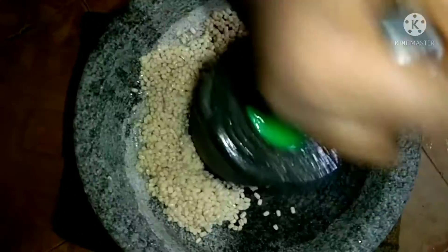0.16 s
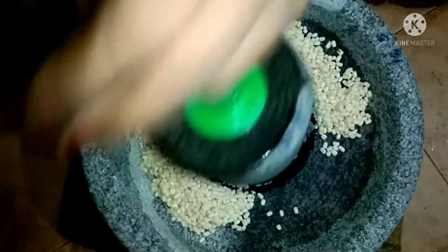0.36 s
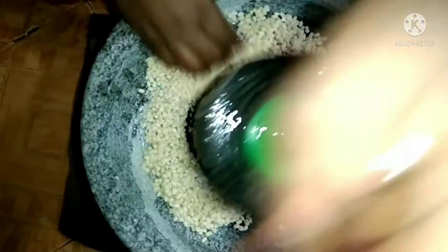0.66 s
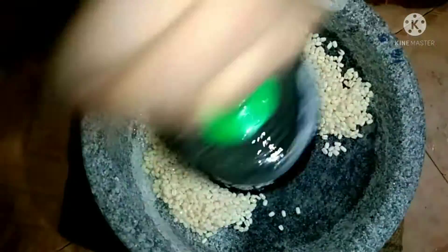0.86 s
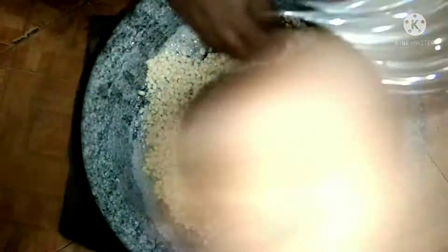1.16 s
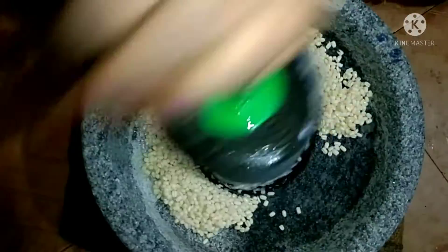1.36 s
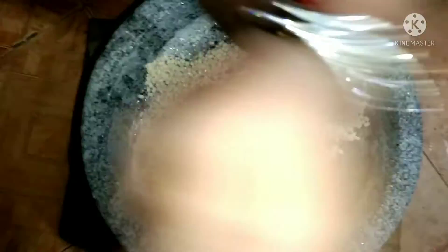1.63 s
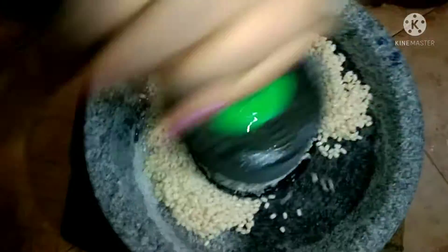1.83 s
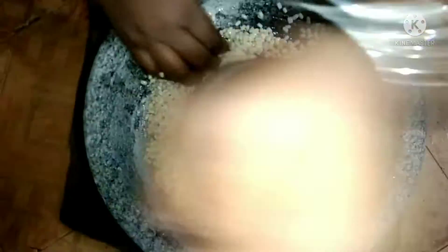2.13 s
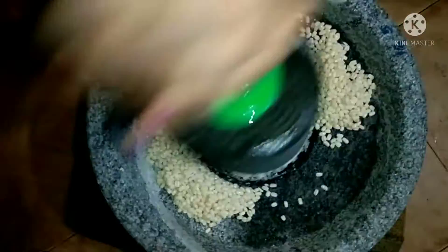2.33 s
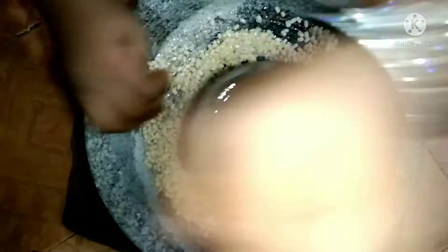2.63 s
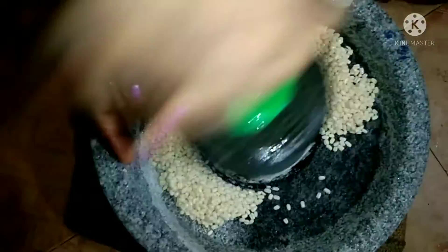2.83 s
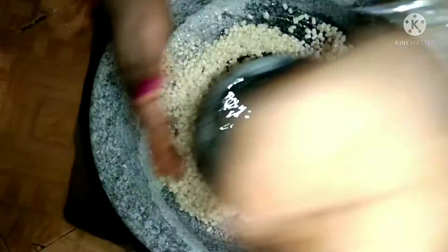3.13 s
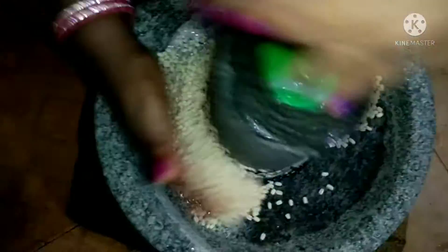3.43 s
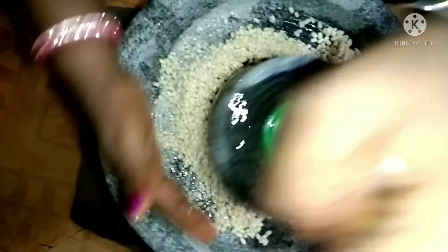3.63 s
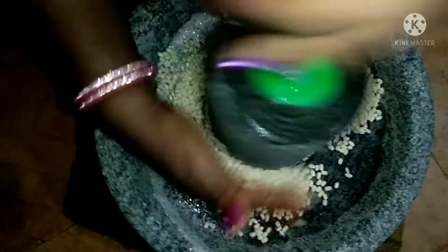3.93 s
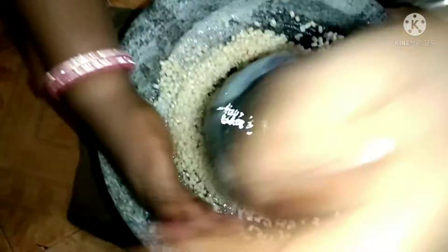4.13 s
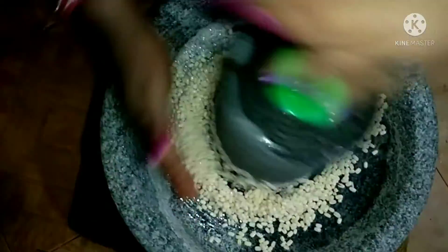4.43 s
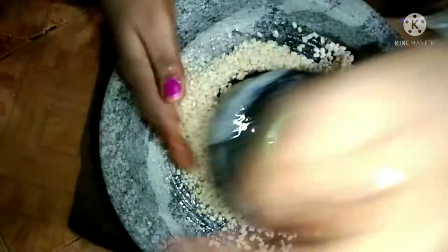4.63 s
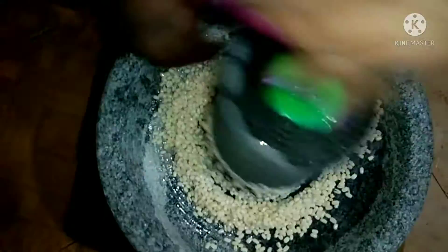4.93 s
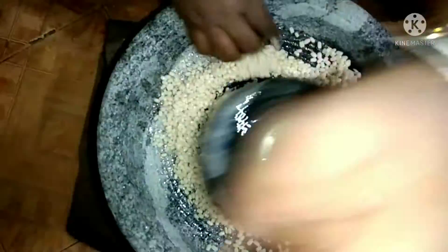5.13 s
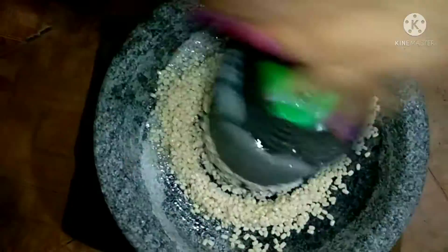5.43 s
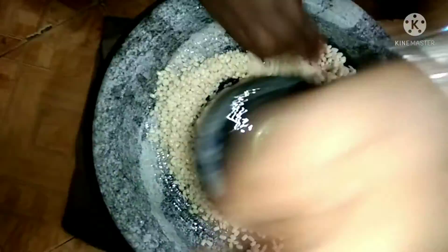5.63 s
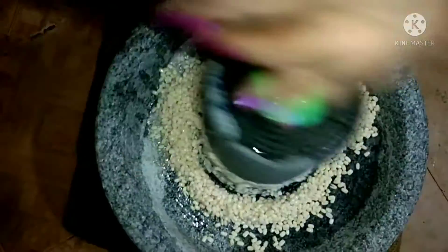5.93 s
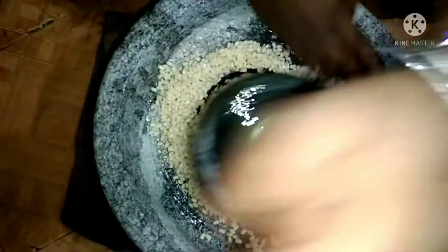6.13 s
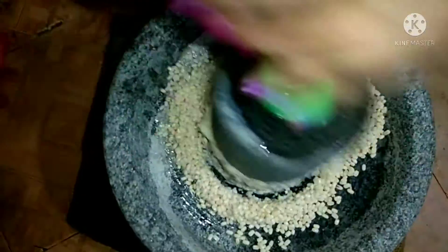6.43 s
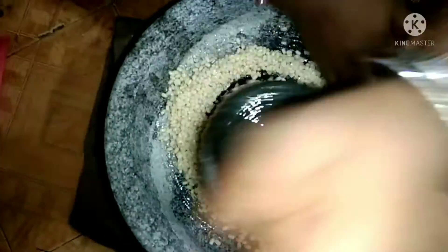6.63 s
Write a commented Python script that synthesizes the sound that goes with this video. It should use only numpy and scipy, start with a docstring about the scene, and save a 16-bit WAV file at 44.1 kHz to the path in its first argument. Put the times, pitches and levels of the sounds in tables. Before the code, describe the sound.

A stone pestle grinds soaked lentils in a heavy mortar, crisp and gritty, with hollow knocks fading midway and a few faint hoarse crow-like rasps.

```python
"""Soaked lentils are crushed in a stone mortar by a pestle rolled by hand, about two turns a second.
Crunching is shaped noise and short resonances swelling at each push; cracks are brief noise bursts.
Knocks on the bowl are sums of decaying modes; rolling stone is grit noise with the bowl resonating.
Behind them the stone hums low through the floor (resonated noise),
and now and then a hoarse rasp like a crow's sounds (a pulse train in a narrow band)."""
import sys
import numpy as np
from scipy import signal
from scipy.fft import rfft, irfft
from scipy.io import wavfile
from scipy.ndimage import uniform_filter1d

SR = 44100
rng = np.random.default_rng(int(sys.argv[2]) if len(sys.argv) > 2 else 0)


def digitize_waveform(pressure):
    """Quantize a signal to 16-bit integers and store it at the path in sys.argv[1].

    Rows of a 2-D input are taken as channels; values are limited to [-1, 1].
    """
    field = np.atleast_2d(pressure).T
    bounded = np.clip(field, -1, 1)
    quanta = np.round(bounded * 32767).astype(np.int16)
    wavfile.write(sys.argv[1], SR, quanta)


N = 298998

# Steady crunch, pushes aside: [t/s, level/dB]
STEADY_CRUNCH = [(0, -43.5), (.5, -45.5), (.8, -41.5), (3.4, -41.5), (6.78, -40.5)]
# Pushes of the pestle, two a turn: [crest t/s, swell level/dB, level/dB of the lull behind it],
# both levels relative to the steady crunch
PUSHES = [(.05, -2.5, -5), (.24, 1, -1), (.39, 5.5, -6), (.68, 5, 0.5), (0.931, 4, -3), (1.1, 0, -5.5),
          (1.27, 8, 0), (1.55, 3, -1), (1.75, -1.5, -1), (2.01, 2, -3), (2.26, 1.5, -1), (2.5, 2.5, 2),
          (2.761, -1.5, -0.5), (3.04, 6, 0), (3.2, 2.5, -1.5), (3.559, 8.5, -7.5), (3.78, -3, 1),
          (4.08, 7.5, -5.5), (4.328, 4, -3), (4.574, 12, -2.5), (4.82, -1.5, -2.5), (5.042, 7.5, -3),
          (5.34, 5, -3), (5.546, 6.5, -6), (5.72, 5, 3), (6.003, 3, -3), (6.276, 4.5, -6), (6.53, 3, -5.5),
          (6.751, 2, 11)]
# Spectrum of crushed grain: [f/Hz, relative level/dB per Hz]
CRUNCH_SPECTRUM = [(1470, -35), (2500, -9.5), (4080, -2.5), (5150, 0), (5690, -3.5), (8020, 3),
                   (14700, -23), (16000, 1)]
# Single lentils cracking: [t/s, relative peak level/dB, f/Hz]
CRACKS = [(0.1532, -22, 6470), (0.337, -15.5, 3700), (0.38, -12.5, 2190), (0.583, -15, 8300),
          (0.653, -11, 8100), (0.6849, -6.5, 9000), (1.098, -12.5, 6160), (1.251, -20, 8450),
          (1.2726, -14, 7950), (1.3068, -14, 7760), (1.374, -24, 7850), (1.5447, -13.5, 8600),
          (1.742, -16.5, 7600), (1.8995, -19, 5600), (1.999, -16, 7900), (2.06, -18.5, 7840),
          (2.1637, -16.5, 8150), (2.496, -10.5, 7300), (2.6903, -16, 8500), (2.982, -14.5, 7840),
          (3.037, -14.5, 9100), (3.064, -14.5, 8160), (3.414, -22.5, 4000), (3.4825, -11, 7600),
          (3.7318, -16, 7340), (3.7773, -12, 8400), (3.864, -21, 4270), (4.0756, -14.5, 6400),
          (4.338, -13, 4700), (4.436, -9.5, 8500), (4.515, -13.5, 7700), (5.024, -16.5, 7840),
          (5.062, -15, 7200), (5.1468, -15.5, 7800), (5.212, -16.5, 6600), (5.346, -16.5, 7800),
          (5.427, -19.5, 7700), (5.502, -16, 4030), (5.506, -9.5, 6300), (5.5119, -8.5, 5300),
          (5.52, -26, 6750), (5.543, -16, 5500), (5.716, -12, 8600), (5.7598, -15.5, 7300),
          (5.987, -16, 7850), (6.043, -15, 5600), (6.2003, -16.5, 7160), (6.434, -18.5, 7200),
          (6.65, -18.5, 8900)]
# Pestle on bowl: [t/s, relative strength level/dB, lowest modes level/dB, low modes level/dB,
# upper modes level/dB, favoured f/Hz, share of the free ring time]
KNOCKS = [(0.022, -25.5, -4, -14, -44, 514, 0.86), (0.224, -7.5, -47, -24, -8.5, 525, 0.55),
          (0.238, -18, -22, -12.5, -12, 730, 0.98), (0.323, -16.5, -17, -27.5, -8.5, 746, 0.54),
          (0.337, -22.5, 0, -20, 3, 1160, 0.24), (0.378, -10.5, -10, -21, -8, 784, 0.48),
          (0.427, -6.5, -43, -44, -13.5, 820, 0.21), (0.689, -27, -13, -13.5, -14, 463, 0.84),
          (0.91, -5, -23.5, -23.5, -17, 504, 0.82), (0.932, -16, -40, -40, -1, 503, 0.29),
          (1.114, -34.5, -7, -3.5, -7, 900, 0.81), (1.396, -4.5, -15.5, -23, -24, 477, 0.27),
          (1.411, -2, -45, -42, -9.5, 780, 0.45), (1.645, -9, -12.5, -19, -14.5, 513, 0.36),
          (1.797, -30, 1, -5, -13.5, 418, 0.67), (1.89, -8.5, -31, -23, -13.5, 780, 0.35),
          (2.166, -14.5, -9.5, -13.5, -19.5, 710, 0.76), (2.304, -22, -7, -9.5, -16.5, 960, 0.32),
          (2.408, -7, -33, -34, -16.5, 896, 0.24), (2.676, -15, -11, -18, -20, 694, 0.93),
          (3.173, -12.5, -7.5, -17, -19.5, 734, 0.5), (3.418, -14.5, -20.5, -22.5, -9.5, 700, 0.4),
          (3.711, -11.5, -17, -14.5, -13, 886, 0.23), (3.919, -37, -15, -13, -20, 460, 0.5),
          (4.208, -17, -10, -19, -19.5, 684, 0.66), (5.318, -55, -43, -51, 7.5, 1135, 0.72),
          (5.587, -42, -9, -42, 3, 650, 0.4), (5.858, -42.5, -3, -15.5, -25, 640, 0.5),
          (6.177, -10, -13.5, -30, -18.5, 676, 0.44), (6.324, -38, -5.5, -36, -4, 640, 0.44),
          (6.705, -40.5, 5, -15.5, -9, 610, 0.63)]
# Modes of mortar and floor: [f/Hz, relative level/dB, free t60/s]
BOWL_MODES = [(225.5, 7.5, 0.17), (335, 2, 0.29), (359.8, 12.5, 0.14), (454.4, -3.5, 0.12),
              (504.3, -2, 0.1), (605, -7, 0.18), (654, 0, 0.075), (719, -6.5, 0.13), (823, 2.5, 0.071),
              (922, 0, 0.13), (1129, 13, 0.035), (1233, -17, 0.36), (1477, -2, 0.038)]
# Stone rolling on stone, lifts aside: [t/s, rumble level/dB, rub level/dB]
ROLLING = [(0, -35, -43.5), (.15, -48, -49.5), (.55, -53.5, -55), (.8, -53.5, -58.5), (1.15, -46.5, -54),
           (1.5, -52, -55.5), (2.0, -50.5, -58), (2.55, -64, -60), (3.3, -62.5, -55.5), (4.4, -71, -58),
           (5.13, -75.5, -59.5), (5.22, -77, -79), (5.485, -74, -83), (5.505, -78, -61), (5.83, -74, -58),
           (5.9, -61.5, -58.5), (6.3, -69, -57.5), (6.68, -77, -76), (6.72, -48.5, -55.5)]
# Spectra of rumble, rub and scrape: [f/Hz, relative level/dB per Hz]
RUMBLE_SPECTRUM = [(170, 2), (230, 2.5), (330, -5), (450, -4), (560, -5.5)]
RUB_SPECTRUM = [(560, -11.5), (640, 3), (800, 3.5), (1000, 5.5)]
SCRAPE_SPECTRUM = [(1060, -13.5), (1170, 1), (1400, 2.5), (2000, 7), (2800, -3), (3600, -62)]
# Hum of the stone: [t/s, level/dB before its swell is evened]
HUM_LEVEL = [(0.0, -48), (1.6, -49.5), (1.66, -39.5), (1.81, -48.5), (2.32, -46), (2.53, -54),
             (2.74, -39.5), (3.0, -48.5), (4.79, -46.5), (5.36, -68), (5.91, -45), (6.7, -51)]
# Spectrum of the noise beneath the hum: [f/Hz, relative level/dB per Hz]
SUBSOIL_SPECTRUM = [(35, -42), (75, 23.5), (135, 9), (170, 2.5)]
# Hoarse rasps: [start t/s, end t/s, start level/dB, end level/dB, nominal start pulses/s, end pulses/s]
RASPS = [(-.05, 0.256, -49, -43.5, 98, 99), (2.886, 3.298, -59, -56.5, 110, 130),
         (4.528, 5.047, -43.5, -53.5, 97, 89)]
# Band of the rasp before it sinks: [f/Hz, relative level/dB per Hz]
RASP_SPECTRUM = [(1580, -7), (1720, 16), (1830, -5), (1960, 15), (2100, -0.5)]

BUILD_S, BREAK_S = 0.04, 0.029   # the crunch builds more slowly than it breaks off
LULL_LAG_S, LULL_S = 0.095, 0.042   # delay of the lull after the crest, and its half-width
HARD_DB, SWING_S = -21, .21   # a hard knock exceeds this strength after at least this free swing
LIFT_S, LIFT_DB = 0.096, -15.5   # before it the pestle leaves the bowl
STOPPED_S = .255   # the knocks before this time stop ringing here
SUBSOIL_DB = -54.5
RASP_FADE_S, RASP_SINK = 0.025, .93   # the band sinks to this share of its pitch
STOP_BAND_HZ = 15700 * 1.03


def pushing():
    """Amplitude modulation by the hand: crunch level in dB, swelling at each push, with a lull after."""
    level_db, = in_time(STEADY_CRUNCH)
    for s, swell_db, lull_db in PUSHES:
        level_db = level_db + swell_db * bump(s, BUILD_S, BREAK_S)
        level_db = level_db + lull_db * bump(s + LULL_LAG_S, LULL_S, LULL_S)
    return level_db


def crunch(level_db):
    """Random fracture: clumped splinter bursts of a millisecond or two and ringing snaps over wet hiss."""
    sizes = amp(4.5 * np.minimum(rng.exponential(1, N), 3.0))
    born = rng.random(N) < 380 * amp(3 * drift(30)) / SR   # breaks per s, clumped
    fade = np.exp(-1 / (.0007 * SR))
    splinters = signal.lfilter([1], [1, -fade], sizes * born) * rng.standard_normal(N)
    snap_rate = 1500 * amp(5.0 * drift(36))
    snaps = grains(snap_rate, 1.7, low_hz=2494, high_hz=16380, cycles=77, count=18)
    hiss = rng.standard_normal(N) * amp(1.94 * drift(130))
    mix = 0.57 * coloured(splinters, CRUNCH_SPECTRUM)
    mix = mix + 0.35 * coloured(snaps, CRUNCH_SPECTRUM)
    mix = mix + 0.68 * coloured(hiss, CRUNCH_SPECTRUM)
    return amp(level_db) * patchy(mix, 2040, 20300, patchy_db=3.0, count=7)


def cracks():
    """Brittle failure: runs of splinters, milliseconds long, mostly near one pitch; deep ones trail longer."""
    out, ms = np.zeros(N + 2000), np.arange(2000) / SR * 1000
    draws = rng.standard_normal((len(CRACKS), 2, 2000))
    for (s, peak_db, hz), (noise, lumps) in zip(CRACKS, draws):
        hold_ms = 1.2 + 3 * lumps[0] ** 2 / (1 + lumps[0] ** 2)
        decay = np.exp(-np.maximum(ms - hold_ms, 0) / .8)
        trail = .25 * np.exp(-ms * hz / 45000)
        shape = (1 - np.exp(-ms / .3)) * (decay + trail)
        drive = noise * shape * amp(18 * uniform_filter1d(lumps, size=30))
        burst = 0
        for share, wide in [(0.83, 1.215), (.22, 1.64)]:   # a narrow and a wide band
            band = signal.butter(2, [hz / wide, hz * wide], "band", fs=SR, output="sos")
            burst = burst + share * signal.sosfilt(band, drive)
        out[round(s * SR):][:2000] += amp(peak_db - 5.0) * burst / np.abs(burst).max()
    return out[:N]


def knocks(rows):
    """Modal excitation: a blow rings every mode by the spot struck; two rebounds and a noisy tail follow."""
    hz, level_db, t60 = np.transpose(BOWL_MODES)[:, :, None]
    out, t = np.zeros(N + SR), np.arange(SR // 3) / SR
    chance = rng.standard_normal((len(rows), 5, len(BOWL_MODES), 1))
    rebounds = rng.random((len(rows), 2))
    for row, draws, late in zip(rows, chance, rebounds):
        s, strength_db, lowest_db, low_db, upper_db, favoured_hz, share = row
        scatter, detune, slip, *rattle = draws
        spot_db = np.select([hz < 280, hz < 420, hz > 750], [lowest_db, low_db, upper_db], -9)
        spot_db = spot_db + 8 * np.exp(-(np.log(hz / favoured_hz) / 0.13) ** 2)
        spot_db = spot_db + 1.5 * scatter
        # the modes meet in a loose crest just after the touch
        phase = 2 * np.pi * hz * (1 + 0.012 * detune) * (t - .0015) + 1.3 * slip
        rings = amp(spot_db + level_db) * np.cos(phase) * 1000 ** (-t / (t60 * share))
        # deep modes and gentle blows swell slowly
        rise_s = 0.002 + 1.22 / hz - min(strength_db + 39.5, 0) * 0.00026
        cushion = np.sin(np.pi / 2 * np.clip(t / rise_s, 0, 1)) ** 2
        blow = amp(strength_db - 4.0) * cushion * rings
        # first touch, then two rebounds whose modes are reweighted by chance
        touches = [(.0008, 0),
                   (0.012 + 0.01185 * late[0], -13 + 5 * rattle[0]),
                   (0.04 + 0.033 * late[1], -19 + 5 * rattle[1])]
        for lag, gain_db in touches:
            out[round((s + lag) * SR):][:len(t)] += (amp(gain_db) * blow).sum(axis=0)
    out = signal.sosfilt(signal.butter(4, 160, "high", fs=SR, output="sos"), out[:N])
    # the kitchen answers with a short wash that soon turns dull
    air = rng.standard_normal(len(t)) * (1 - np.exp(-t / 0.00096))
    dull = signal.sosfilt(signal.butter(2, 600, fs=SR, output="sos"), air)
    wash = air * 1000 ** (-t / 0.15) + 0.41 * dull * 1000 ** (-t / 0.61)
    return out + amp(-39.0) * signal.fftconvolve(out, wash)[:N]


def lifting():
    """Loss of contact: dB taken off the rolling while the pestle is in the air before a hard knock."""
    s, strength_db = np.transpose(KNOCKS)[:2]
    landings = s[(strength_db > HARD_DB) & (np.diff(s, prepend=0) > SWING_S)]
    return LIFT_DB * sum(bump(landing - .015, LIFT_S, 0.0035) for landing in landings)


def rolling(rumble_db, rub_db, scrape_db):
    """Frictional excitation: grit under the stone gives a deep rumble, a hollow rub and a lighter scrape."""
    grit = grains(4000, 0.91, low_hz=165.7, high_hz=3370, cycles=11.9, count=18)
    grit = patchy(grit, 126.5, 4120, patchy_db=3.5, count=8)
    # the bowl rings along, each mode in its own time
    bowl = sum(amp(6.4 * drift(2.5)) * rms_one(ring(grit, hz, t60 / 2)) for hz, _, t60 in BOWL_MODES)
    grit = grit + 0.45 * rms_one(bowl)
    rumble = amp(rumble_db) * coloured(grit, RUMBLE_SPECTRUM)
    rub = amp(rub_db) * coloured(grit, RUB_SPECTRUM)
    scrape = amp(scrape_db) * coloured(grit, SCRAPE_SPECTRUM)
    return rumble + rub + scrape


def hum(level_db):
    """Resonance driven by noise: heavy stone hums near 100 Hz through the floor, over a deep noise."""
    tone = rms_one(ring(ring(rng.standard_normal(N), 97.9, 0.28), 134.4, 0.045))
    # a steady push evens the swell
    tone = tone / np.sqrt(uniform_filter1d(tone ** 2, size=6000) + 0.17)
    subsoil = coloured(rng.standard_normal(N), SUBSOIL_SPECTRUM)
    return amp(level_db) * tone + amp(SUBSOIL_DB) * subsoil


def rasp():
    """Pulse excitation of a formant: nearly even pulses and noise pass through a narrow, sinking band."""
    t, gain, per_s, sunk = np.arange(N) / SR, np.zeros(N), np.full(N, 95.0), np.zeros(N)
    for start, end, start_db, end_db, first, last in RASPS:
        along = np.clip((t - start) / (end - start), 0, 1)
        edge = np.clip(np.minimum(t - start, end - t) / RASP_FADE_S, 0, 1)
        gain += amp(start_db + (end_db - start_db) * along) * edge
        per_s[edge > 0] = (first + (last - first) * along ** 2)[edge > 0]
        sunk[edge > 0] = along[edge > 0]
    cycles = np.cumsum(per_s * amp(0.11 * drift(9))) / SR
    pulses = np.diff(np.floor(cycles), prepend=0)
    drive = rms_one(pulses) + .45 * rng.standard_normal(N)
    high = coloured(drive, RASP_SPECTRUM)
    low = coloured(drive, np.multiply(RASP_SPECTRUM, [RASP_SINK, 1]))
    tone = (1 - sunk) * high + sunk * low
    return gain * patchy(tone, 1450, 2150, patchy_db=2.0, count=6)   # it catches unevenly


def amp(db):
    """Level definition: decibels to amplitude gain."""
    return 10 ** (np.asarray(db) / 20)


def rms_one(x):
    """Normalisation of power: scale to rms 1."""
    return x / np.sqrt(np.mean(x ** 2) + 1e-20)


def in_time(rows):
    """Linear interpolation: the columns of a curve table at every sample."""
    s, *columns = np.transpose(rows)
    return [np.interp(np.arange(N) / SR, s, c) for c in columns]


def bump(s, before_s, after_s):
    """Two-sided Gaussian: a smooth hill of height 1 at time s."""
    t = np.arange(N) / SR - s
    return np.exp(-(t / np.where(t < 0, before_s, after_s)) ** 2)


def drift(rate):
    """Low-passed noise: slow chance at about rate per second, drawn coarsely and joined up; rms 1."""
    step = 16
    r = np.exp(-2 * np.pi * rate * step / SR)
    noise = rng.standard_normal((N + SR) // step + 2)
    slow = signal.lfilter([1], [1, -2 * r, r * r], noise)[SR // step:]   # settled after a second
    return rms_one(np.interp(np.arange(N) / step, np.arange(len(slow)), slow))


def coloured(x, spectrum):
    """Spectral filtering: shape by a [f/Hz, level/dB] table, closed steeply outside; rms 1."""
    hz, level_db = np.transpose(spectrum)
    grid = np.log(np.arange(1, N // 2 + 2) * SR / N)
    outside = np.maximum(np.log(hz[0]) - grid, 0) + np.maximum(grid - np.log(hz[-1]), 0)
    gain_db = np.interp(grid, np.log(hz), level_db) - 80 * outside
    return rms_one(irfft(rfft(x) * amp(gain_db), N))


def patchy(x, low_hz, high_hz, patchy_db, count):
    """Independent band modulation: every band swells and fades in its own time; rms 1."""
    edges = np.geomspace(low_hz, high_hz, count + 1)
    out = 0
    for k, pair in enumerate(zip(edges, edges[1:])):
        band = signal.sosfilt(signal.butter(2, pair, "band", fs=SR, output="sos"), x)
        out = out + band * amp(patchy_db * drift(9.7)) * (-1) ** k
    return rms_one(out)


def ring(clicks, hz, t60):
    """Damped resonator: a unit click starts a decaying sine of initial height 1."""
    r, w = 1000 ** (-1 / (t60 * SR)), 2 * np.pi * hz / SR
    return signal.lfilter([0, np.sin(w)], [1, -2 * r * np.cos(w), r * r], clicks + 1e-18)


def grains(per_s, spread_db, low_hz, high_hz, cycles, count):
    """Random impulses on resonators: uneven snaps dealt among pitches, each falling 60 dB in given cycles."""
    sizes = amp(spread_db * np.minimum(rng.exponential(1, N), 5)) * rng.choice([-1, 1], N)
    born, dealt = rng.random(N) < per_s / SR, rng.integers(0, count, N)
    out = 0
    for k, hz in enumerate(np.geomspace(low_hz, high_hz, count)):
        t60 = cycles / hz
        out = out + ring(sizes * born * (dealt == k), hz, t60) / np.sqrt(t60)
    return out


def scene():
    """Superposition: all sources sum at one microphone."""
    stop = np.clip((STOPPED_S - np.arange(N) / SR) / .003, 0, 1)
    early_blows = stop * knocks([k for k in KNOCKS if k[0] < STOPPED_S])
    blows = early_blows + knocks([k for k in KNOCKS if k[0] >= STOPPED_S])
    crunch_db, lift_db = pushing(), lifting()
    rumble_db, rub_db = in_time(ROLLING)
    # the scrape follows the crunch in part, and a hard rub
    scrape_db = -55.5 + 0.65 * (crunch_db + 43.5) + 0.68 * np.maximum(rub_db + 54.5, 0)
    stone = rolling(rumble_db + lift_db, rub_db + lift_db, scrape_db)
    mix = crunch(crunch_db) + cracks() + blows + stone + hum(*in_time(HUM_LEVEL)) + rasp()
    return mix[None]


def record(dry):
    """Low-pass filtering: the top is cut, by 60 dB from the stop-band edge upwards."""
    return signal.sosfilt(signal.cheby2(12, 60, STOP_BAND_HZ, fs=SR, output="sos"), dry)


dry = scene()
out = record(dry)
digitize_waveform(out)
```